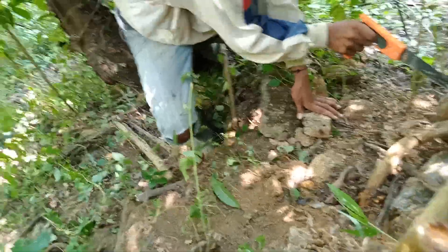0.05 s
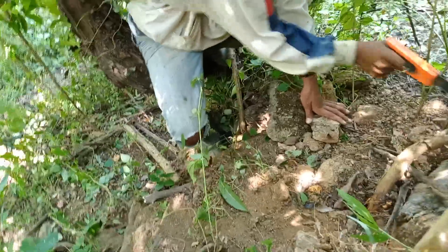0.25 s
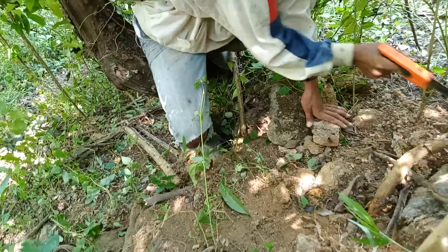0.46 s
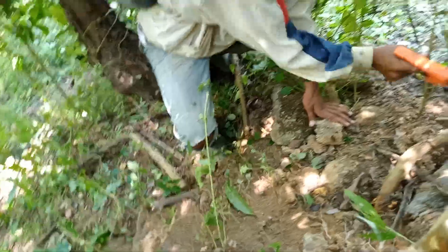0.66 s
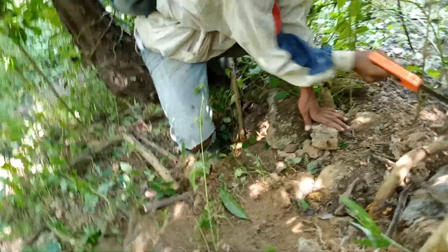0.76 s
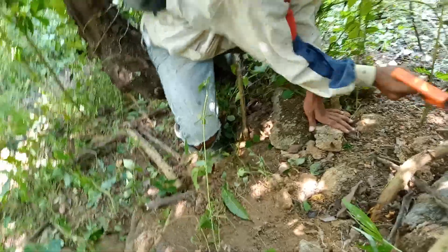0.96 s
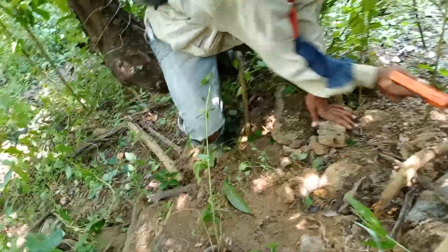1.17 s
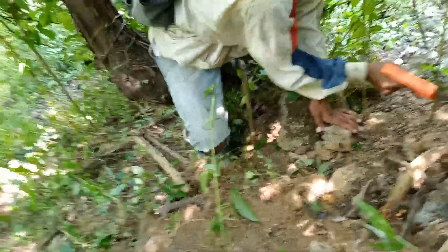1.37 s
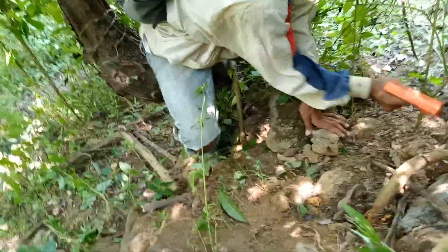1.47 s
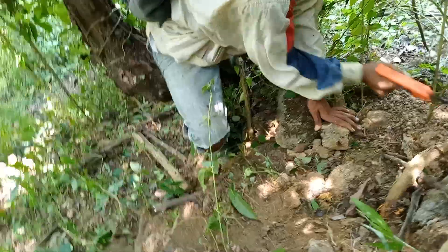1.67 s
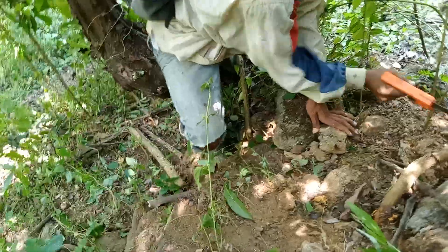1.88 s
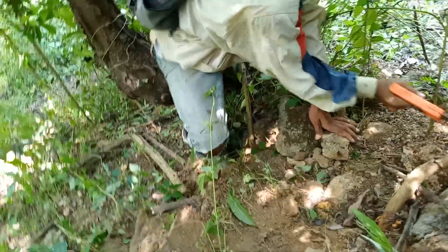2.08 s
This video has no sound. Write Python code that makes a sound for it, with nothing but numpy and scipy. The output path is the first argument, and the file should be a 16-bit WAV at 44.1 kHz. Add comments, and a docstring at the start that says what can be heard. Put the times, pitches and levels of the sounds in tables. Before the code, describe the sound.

A hand saw makes one light scrape, then quick, raspy push-and-pull strokes through a root, some ending in a dull woody knock; dry leaves rustle and twigs tick outdoors, heard close on a phone.

```python
"""Pruning saw in a thin root

A hand saw cuts a root on a wooded slope, a metre or two from a phone: one light stroke, then quick pushes and
pulls. Teeth and snags gate noise that rings blade and wood; some pulls end in a dull knock, a sagging sine over
a thud. Dry litter rustles as flickering shaped noise and ticks in tiny bursts; a low breeze rumbles underneath."""
import sys
import numpy as np
from scipy import signal
from scipy.fft import rfft, irfft
from scipy.io import wavfile
from scipy.ndimage import uniform_filter1d

SR = 44100
rng = np.random.default_rng(int(sys.argv[2]) if len(sys.argv) > 2 else 0)


def generate_wav(sig):
    """Save sig (samples, or channels by samples) to the path in sys.argv[1] as 16-bit PCM at SR."""
    pcm = np.round(np.clip(np.atleast_2d(sig).T, -1, 1) * 32767).astype(np.int16)
    wavfile.write(sys.argv[1], SR, pcm)


N = 94065  # length in samples


def undb(db):
    """Gain from dB."""
    return 10 ** (np.asarray(db) / 20)


def unit(x):
    """Scale to rms 1."""
    return x / np.sqrt(np.mean(x ** 2))


def ring(x, hz, width_hz):
    """Two-pole resonance, gain 1 at the centre."""
    return signal.lfilter(*signal.iirpeak(hz, hz / width_hz, fs=SR), x)


def colour(x, table):
    """Shape noise by (f/Hz, level/dB) points joined on a log frequency axis, then scale to rms 1."""
    f = np.arange(1, N // 2 + 2) * SR / N
    points_hz, points_db = np.array(table).T
    gain = undb(np.interp(np.log(f), np.log(points_hz), points_db))
    return unit(irfft(rfft(x) * gain, N))


def walk(rate_hz):
    """Smooth random wander, rms 1."""
    k = max(int(SR / rate_hz), 2)
    steps = np.repeat(rng.standard_normal(N // k + 1), k)[:N]
    return unit(uniform_filter1d(uniform_filter1d(steps, k), k))


def grit(scatter_db):
    """Dense grains: mostly small, now and then a big one."""
    return unit(rng.standard_normal(N) * undb(scatter_db * rng.exponential(size=N)))


# tone of the dry leaves: f/Hz, relative level/dB (spectral density)
RUSTLE_TONE = [(120, 10), (200, -6), (916, 3), (1160, -4.5), (2860, 4), (3190, 0.5), (3970, 4), (4950, -12),
               (7140, -14.5), (8740, -2), (11900, -10), (16000, -53)]
# loudness of the leaves before the flicker: t/s, level/dB
RUSTLE_FADER = [(0, -58.5), (.03, -59), (.075, -62), (.12, -68.5), (.145, -59), (.17, -62.5), (.25, -60.5),
                (.42, -66.5), (.49, -74), (.62, -62), (.74, -60), (.77, -57.5), (.92, -61), (1.06, -57),
                (1.2, -59), (1.33, -60), (1.36, -56), (1.49, -60.5), (1.6, -58), (1.75, -58.5),
                (1.87, -59.5), (2.01, -61.5), (2.13, -56)]
RUSTLE_GRAIN_DB = 2.0
RUSTLE_FLICKER_HZ, RUSTLE_FLICKER_DB = 60.35, 1.5


def litter(t):
    """Dry leaves rustle: shaped grainy noise whose level flickers quickly."""
    db = np.interp(t, *np.array(RUSTLE_FADER).T) + RUSTLE_FLICKER_DB * walk(RUSTLE_FLICKER_HZ)
    return undb(db) * colour(grit(RUSTLE_GRAIN_DB), RUSTLE_TONE)


# tone of the moving air: f/Hz, relative level/dB (spectral density)
BREEZE_TONE = [(60, -14), (270, -20), (400, -19), (1500, -28), (2900, -22), (5000, -30), (7000, -37),
               (9300, -31), (12500, -34), (15000, -31)]
BREEZE_DB = -66
RUMBLE_HZ, RUMBLE_WIDTH_HZ, RUMBLE_DB = 95, 70, -69
GUST_HZ, GUST_DB = 9.1, 2


def breeze():
    """Moving air: a steady hiss and a low resonant rumble that swells and sinks."""
    hiss = colour(rng.standard_normal(N), BREEZE_TONE)
    rumble = unit(ring(rng.standard_normal(N), RUMBLE_HZ, RUMBLE_WIDTH_HZ))
    return undb(BREEZE_DB) * hiss + undb(RUMBLE_DB + GUST_DB * walk(GUST_HZ)) * rumble


# ticks of twigs and grit: t/s, peak level of the mid/dB, centre f/Hz, treble level against the mid/dB
TWIG_TICKS = [(0.013, -48, 2900, -5), (0.02, -45.5, 2900, -5.5), (0.0454, -34, 3120, 0),
              (0.0882, -43.5, 2800, -20), (0.135, -48.5, 2400, -8), (.192, -53, 3560, 8.5),
              (0.408, -45, 2560, -2), (0.734, -45.5, 3020, -2), (0.781, -43, 2510, -5.5),
              (1.055, -41.5, 2930, -9), (1.0786, -47, 2520, -10), (1.3445, -36, 2310, -18),
              (1.3595, -39.5, 2620, 0.5), (1.5736, -33, 4180, -12)]
TICK_RISE_S, TICK_FALL_S = 0.0007, 0.003  # time constants
TICK_WIDTH_HZ, TICK_TOP_HZ = 1300, 9300


def ticks(t):
    """Twigs and grit snap: tiny noise bursts ring a mid and a bright band."""
    out = np.zeros(N)
    for s, db, hz, top_db in TWIG_TICKS:
        u = np.maximum(t - s, 0)
        burst = rng.standard_normal(N) * -np.expm1(-u / TICK_RISE_S) * np.exp(-u / TICK_FALL_S)
        mid = ring(ring(burst, hz, TICK_WIDTH_HZ), hz, 2 * TICK_WIDTH_HZ)
        top = ring(ring(burst, TICK_TOP_HZ, TICK_WIDTH_HZ), TICK_TOP_HZ, 3900.0)
        top += 0.26 * ring(burst, 11500.0, 5500.0)  # airy edge
        out += undb(db) * (mid / np.abs(mid).max() + undb(top_db) * top / np.abs(top).max())
    return out


# one list of points per saw stroke: t/s, rasp level/dB, wood level against rasp/dB, treble level against rasp/dB
SAW_STROKES = [
    [(0.25, -65, -23, -11), (0.258, -65.5, 1, -5), (0.274, -51, -5, -2.5), (0.314, -53, -0.5, -9.5),
     (0.342, -48, -14, -4.5), (0.386, -51.5, -1, -11.5), (0.4, -78, -23, 2), (0.405, -69.5, -29.5, -9)],
    [(0.49, -66, -13, -12), (0.498, -51, -8, -11), (0.516, -44, -5, -11.5), (0.554, -47, 0, -6.5),
     (0.566, -43, -8.5, -8), (0.59, -49, 0, -7.5), (0.615, -86, 6, 13)],
    [(0.628, -48, -1, -2), (0.636, -58, -5.5, -6), (0.676, -43.5, -0.5, -12), (0.688, -49.5, -2, -7.5),
     (0.702, -38.5, -8.5, -14), (0.71, -49.5, -20, 0), (0.72, -69, -2, 6), (0.728, -62, -8, 6)],
    [(0.793, -52.5, 3, -16), (0.807, -41, -14, -8.5), (0.837, -37, -14, -2.5), (0.863, -41, -13, -8.5),
     (0.873, -39, -12.5, -13), (0.901, -49, -18, -4.5), (0.915, -70, 8, -13)],
    [(0.925, -57, -9, -13), (0.949, -41.5, -2.5, -9), (0.991, -33.5, -4.5, -10.5),
     (1.009, -40.5, -3.5, -8.5), (1.023, -61, -24, 5), (1.035, -68, 8, -12)],
    [(1.085, -62, -3, -11), (1.091, -51.5, -3, -13.5), (1.125, -41.5, -11.5, -8), (1.147, -38, -8, -6),
     (1.181, -48, -8.5, -2.5), (1.2, -88, 5, 3)],
    [(1.205, -75, 4, -8), (1.211, -63, -4, -22), (1.223, -53, 3, -4), (1.239, -45, -7, -16),
     (1.253, -41, -1, -9), (1.261, -38, -3.5, -12), (1.293, -65, -13, 3), (1.31, -57, -16, -9)],
    [(1.37, -53, -17, -12), (1.378, -45, -7, -7), (1.384, -46.5, -5.5, -7), (1.428, -38.5, -6.5, -12),
     (1.454, -46, -7.5, -2), (1.482, -71, 4, -1)],
    [(1.49, -52, -8, -10), (1.506, -46, -14, -10.5), (1.518, -45.5, -7, -8.5), (1.548, -36.5, -1, -12.5),
     (1.568, -41, -6, -4), (1.59, -78, -35, 4)],
    [(1.605, -59, -8, -3), (1.613, -53.5, -8, -9), (1.683, -33.5, -15.5, -7), (1.703, -44, -5, -1),
     (1.715, -45, -6, -14), (1.75, -54.5, -15, -4)],
    [(1.755, -55, -3, -8), (1.799, -33.5, -6.5, -11), (1.829, -41.5, -5.5, -7.5), (1.843, -53, -1, 2),
     (1.855, -73, -13, -1)],
    [(1.878, -63, -31, -11), (1.886, -56, 1, -10), (1.898, -49, -10, -14), (1.944, -35.5, -14, -10),
     (1.968, -40.5, -6.5, -11.5), (1.996, -52, -17, -1.5), (2.008, -75, -9, 15)],
    [(2.012, -67, -6, -3), (2.018, -54, -3, -8), (2.032, -43.5, -9.5, -9), (2.042, -55.5, -1, -6),
     (2.06, -42.5, -10.5, -15), (2.086, -46.5, -2, -6.5), (2.12, -66, -16, 4)],
]


def strokes(t):
    """The arm's effort: rasp gain, with wood and treble gains, lightly smoothed throughout."""
    push, colours = np.zeros(N), np.zeros((2, N))
    for rows in SAW_STROKES:
        time, rasp_db, wood_db, treble_db = np.array(rows).T
        on = (t >= time[0]) & (t < time[-1])
        push += on * undb(np.interp(t, time, rasp_db))
        colours += [on * undb(np.interp(t, time, db)) for db in (wood_db, treble_db)]
    wood, treble = uniform_filter1d(colours, size=180)
    return uniform_filter1d(push, size=180), wood, treble


TEETH_HZ, TEETH_JITTER, TEETH_SCATTER_DB = 111.02, 0.3, 2.5
BITE_S = 0.0033  # time from the start of a bite to its peak
SLIDE_SHARE = 0.6  # steady pressure against the rms of the bites


def teeth():
    """Uneven tooth bites: each a quick burst of pressure above a steady slide."""
    gap_chance, size_chance = rng.standard_normal((600, 2)).T
    at = (np.cumsum(np.exp(TEETH_JITTER * gap_chance)) * SR / TEETH_HZ).astype(int)
    bites = np.zeros(N)
    bites[at[at < N]] = undb(TEETH_SCATTER_DB * size_chance[at < N])
    fall = np.exp(-1 / (BITE_S * SR))
    pressure = signal.lfilter([1], [1, -2 * fall, fall ** 2], bites)
    return unit(pressure) + SLIDE_SHARE


# hard snags of a tooth in the grain: t/s, nominal peak level/dB (the force sits CREST_DB lower)
GRAIN_SNAGS = [(0.271, -41.5), (0.2925, -29.5), (0.3351, -30), (0.3794, -42), (0.4998, -61), (0.5167, -37),
               (0.5632, -23), (0.5824, -42), (0.6396, -27.5), (0.6573, -31), (0.6898, -20.5), (0.6988, -26),
               (0.809, -33), (0.8366, -19.5), (0.8709, -35), (0.946, -26.5), (0.9714, -43), (0.9884, -28),
               (1.0034, -37), (1.1174, -27.5), (1.148, -29), (1.2156, -40), (1.239, -39), (1.3848, -24),
               (1.3982, -22), (1.4111, -18), (1.4273, -23), (1.4422, -30.5), (1.502, -25), (1.5114, -34),
               (1.5284, -41), (1.5434, -38), (1.629, -31.5), (1.6468, -25.5), (1.6791, -33), (1.7785, -21),
               (1.7914, -39), (1.8003, -29), (1.8127, -22.5), (1.8254, -39), (1.9016, -32), (1.921, -23.5),
               (1.943, -21), (1.9608, -19.5), (2.017, -32), (2.0288, -40), (2.0623, -21)]
SNAG_RISE_S, SNAG_FALL_S = 0.0007, 0.003  # time constants
CREST_DB = 9  # peak over rms


def snags(t):
    """A tooth catches in the grain: force jumps and dies away within milliseconds."""
    force = np.zeros(N)
    for s, db in GRAIN_SNAGS:
        u = np.maximum(t - s, 0)
        force += undb(db - CREST_DB) * -np.expm1(-u / SNAG_RISE_S) * np.exp(-u / SNAG_FALL_S)
    return force


FIBRE_DB = 2  # grain scatter
MODE_WANDER_DB, WANDER_HZ = 3, 20
PAIR_SHARE = 0.012  # fixed offset of each resonance from the pair's centre, as a share of it


def body(force, table):
    """Grit under a force rings close pairs of resonances, whose strength wanders as the contact point slides."""
    grains = grit(FIBRE_DB)
    gains = [undb(db + MODE_WANDER_DB * walk(WANDER_HZ)) for _, _, db in table]

    def play(x):
        """Sum of the pairs, the upper one in opposite sign."""
        return sum(ring(g * x, f * (1 - PAIR_SHARE), w) - ring(g * x, f * (1 + PAIR_SHARE), w)
                   for g, (f, w, _) in zip(gains, table))

    return play(force * grains) / np.std(play(grains))


# resonances of the rasp: blade, wood and bright top, with the microphone's colour:
# f/Hz, width f/Hz, relative level/dB
BLADE_MODES = [(1274, 203, -4), (1499, 150, -4.5), (1664, 190, -1), (2454, 340, -1.5), (2613, 180, -2.5),
               (2874, 420, -0.5), (3054, 330, -1.5), (3296, 330, -5.5), (3565, 55, -12), (3840, 300, -6),
               (4405, 420, -10.5), (4643, 810, -11), (2690, 6000, -13.5)]
WOOD_MODES = [(357.5, 130, -0.5), (602.6, 210, 3), (758, 296, 1), (217, 56, -6)]
TOP_MODES = [(6920, 600, -2), (9300, 400, -4), (9500, 2200, -3), (5860, 1940, -1), (8150, 2460, 8)]
SHAKE_HZ, SHAKE_WIDTH_HZ, SHAKE_DB = 102, 135.0, -16.5  # low shake of the hand, against the rasp
HISS_HZ, HISS_DB = 10600, -8  # broad airy hiss at the top of the rasp, against its bright resonances


def saw(t):
    """Tearing fibres, gated by teeth and snags, ring blade and wood; a low hand shake follows the strokes."""
    push, wood, treble = strokes(t)
    force = np.hypot(push * unit(teeth()), snags(t))
    shake = unit(ring(rng.standard_normal(N), SHAKE_HZ, SHAKE_WIDTH_HZ))
    shake *= uniform_filter1d(push, size=2000)
    hiss = unit(signal.lfilter(*signal.butter(2, HISS_HZ, "high", fs=SR), grit(FIBRE_DB)))
    rasp = body(force, BLADE_MODES) + body(force * wood, WOOD_MODES)
    top = body(force * treble, TOP_MODES) + undb(HISS_DB) * hiss * force * treble
    return rasp + top + undb(SHAKE_DB) * shake


# knocks at the end of pull strokes: t/s, level of the woody ring/dB, starting pitch f/Hz
PULL_KNOCKS = [(.692, -34, 232), (1.283, -40.5, 291), (1.563, -31.5, 378), (1.836, -33.5, 386)]
KNOCK_T60_S, KNOCK_SAG_PER_S = 0.046, 35
THUD_HZ, THUD_DB, THUD_T60_S = 116, -15, 0.1  # level against the ring


def knocks(t):
    """A short woody ring that sags in pitch, with a lower thud under it."""
    out = np.zeros(N)
    for s, db, hz in PULL_KNOCKS:
        u = np.maximum(t - s, 0)
        turns = hz * -np.expm1(-KNOCK_SAG_PER_S * u) / KNOCK_SAG_PER_S
        woody = np.sin(2 * np.pi * turns) * undb(-60 * u / KNOCK_T60_S)
        thud = np.sin(2 * np.pi * THUD_HZ * u) * undb(THUD_DB - 60 * u / THUD_T60_S)
        out += undb(db) * (woody + thud)
    return out


ECHO_T60_S, ECHO_DB, ECHO_TOP_HZ = 0.12, -18, 3850


def scatter(near, t):
    """Trunks and slope answer with a short, dull, decaying noise tail."""
    tail = signal.lfilter(*signal.butter(2, ECHO_TOP_HZ, fs=SR), rng.standard_normal(8000))
    tail *= undb(-60 * t[:8000] / ECHO_T60_S)
    return undb(ECHO_DB) * signal.fftconvolve(near, tail / np.sqrt(np.sum(tail ** 2)))[:N]


def scene():
    """Saw, knocks and ticks get the scatter; litter and breeze stay dry."""
    t = np.arange(N) / SR
    ground = litter(t) + breeze()
    near = ticks(t) + saw(t) + knocks(t)
    return (near + scatter(near, t) + ground)[None]


TOP_HZ = 15430


def record(dry):
    """The phone cuts the deep bass and the top."""
    dry = signal.sosfilt(signal.butter(3, 70., "high", fs=SR, output="sos"), dry)
    dry = signal.sosfilt(signal.ellip(8, .2, 28, TOP_HZ, fs=SR, output="sos"), dry)
    return signal.sosfilt(signal.ellip(10, .2, 60, TOP_HZ + 400, fs=SR, output="sos"), dry)


dry = scene()
out = record(dry)
generate_wav(out)
```